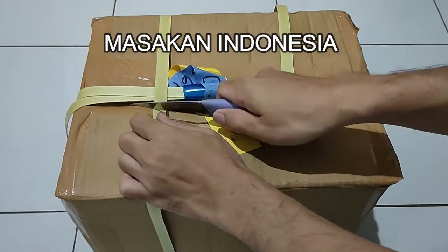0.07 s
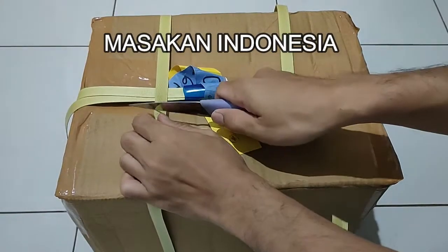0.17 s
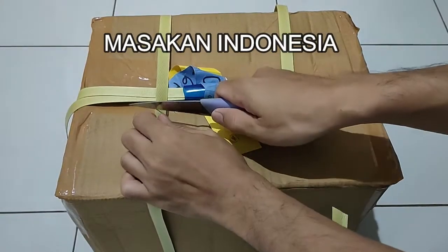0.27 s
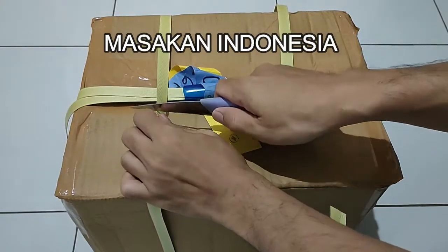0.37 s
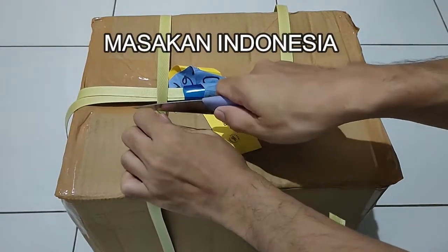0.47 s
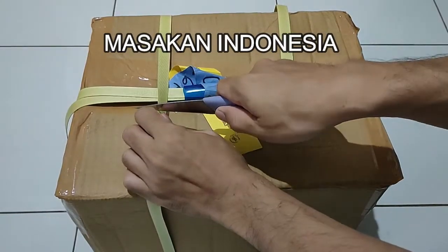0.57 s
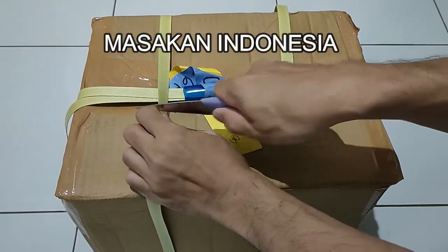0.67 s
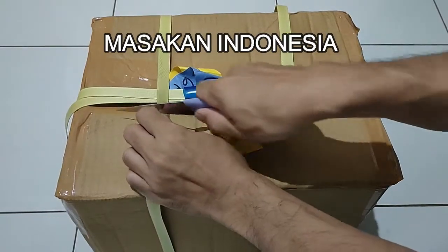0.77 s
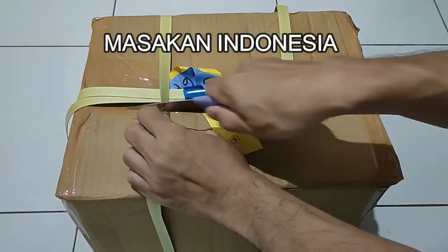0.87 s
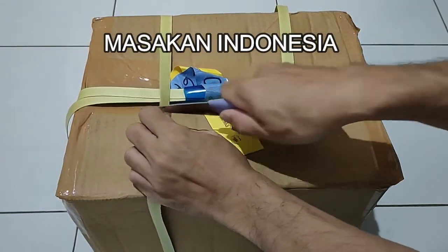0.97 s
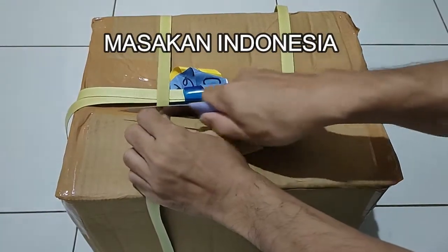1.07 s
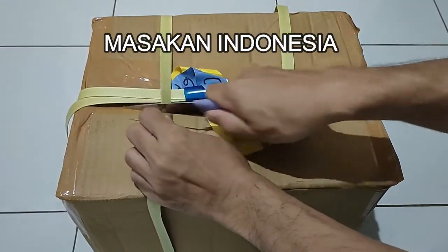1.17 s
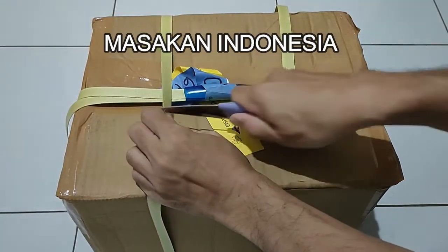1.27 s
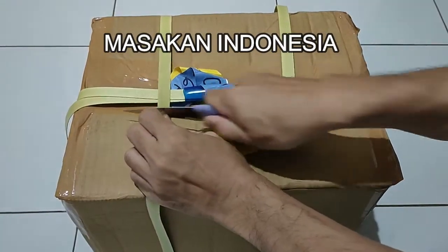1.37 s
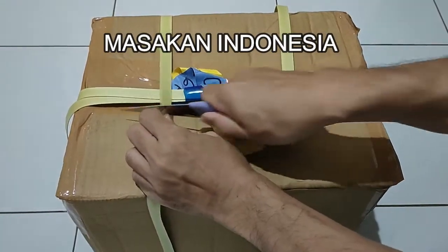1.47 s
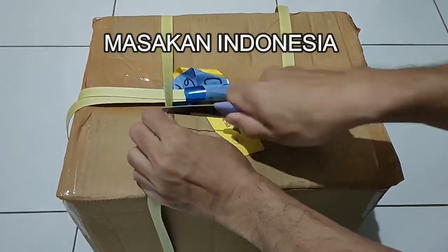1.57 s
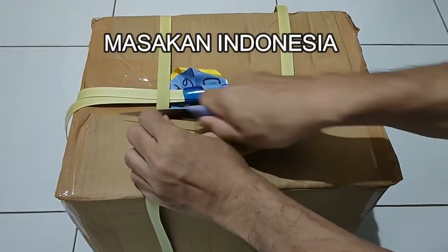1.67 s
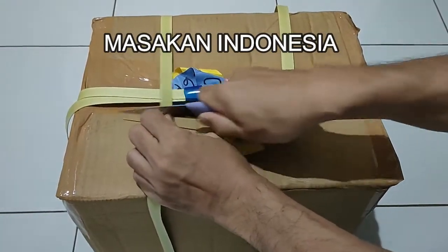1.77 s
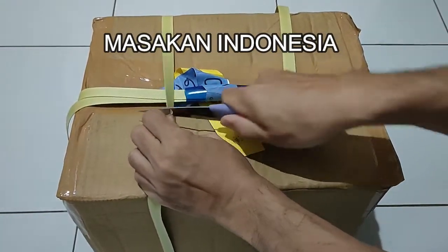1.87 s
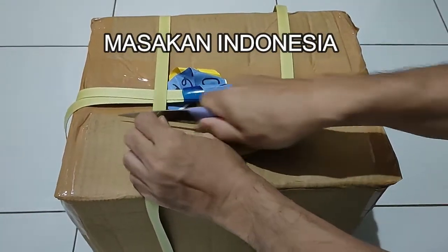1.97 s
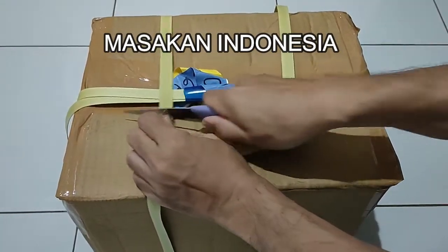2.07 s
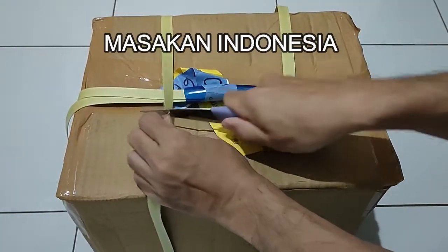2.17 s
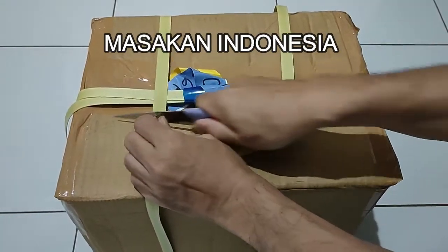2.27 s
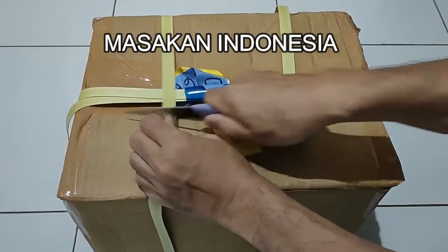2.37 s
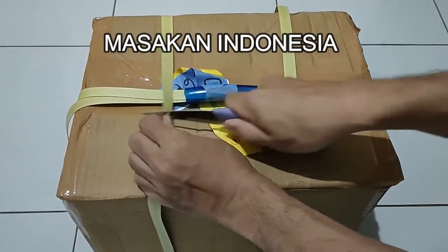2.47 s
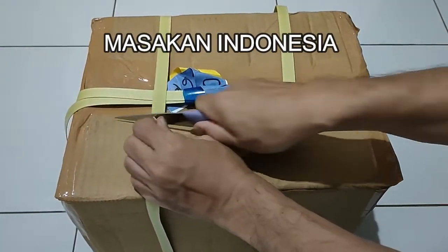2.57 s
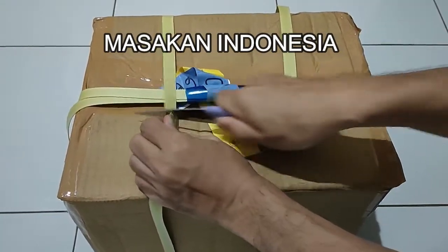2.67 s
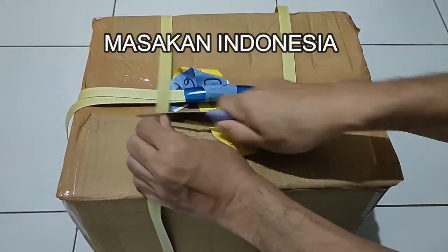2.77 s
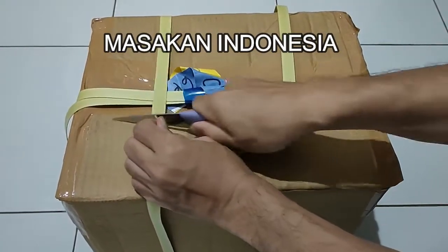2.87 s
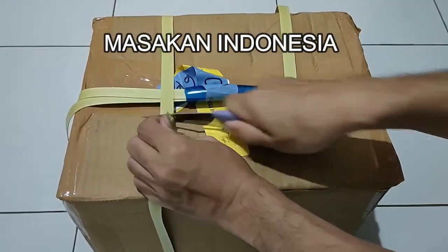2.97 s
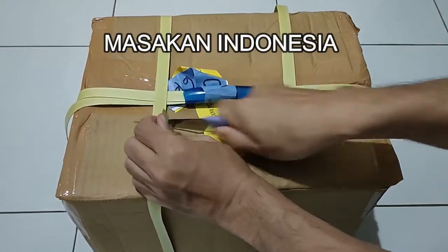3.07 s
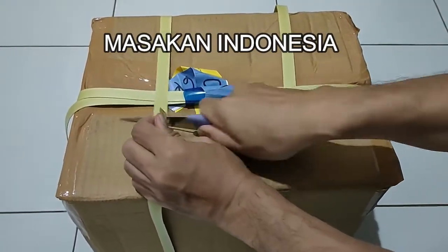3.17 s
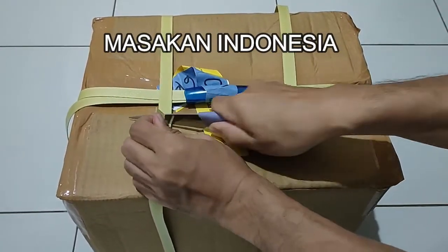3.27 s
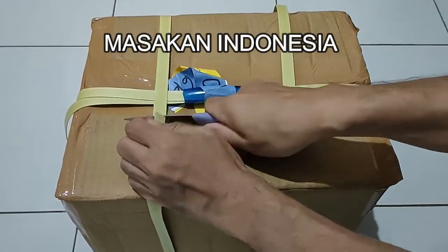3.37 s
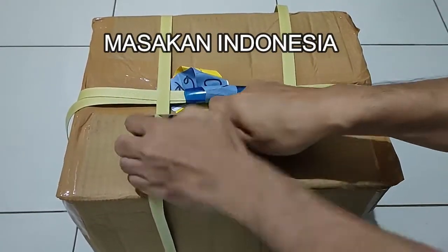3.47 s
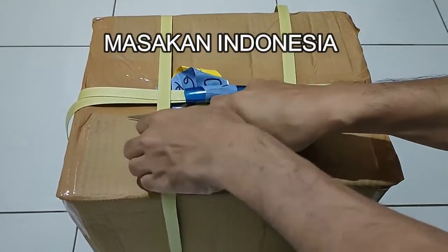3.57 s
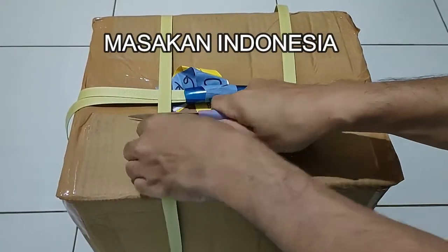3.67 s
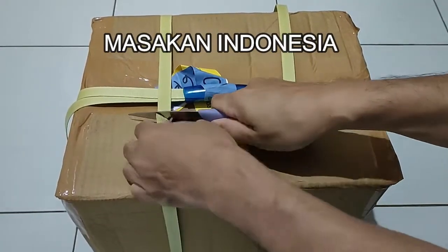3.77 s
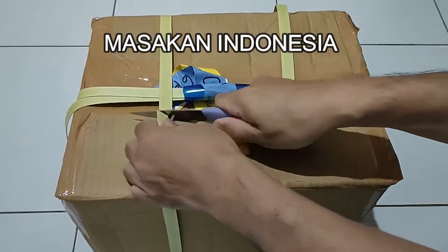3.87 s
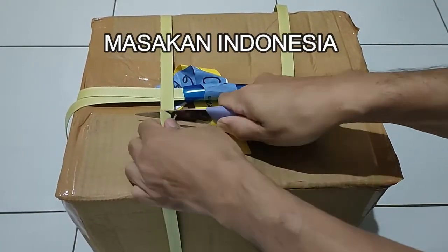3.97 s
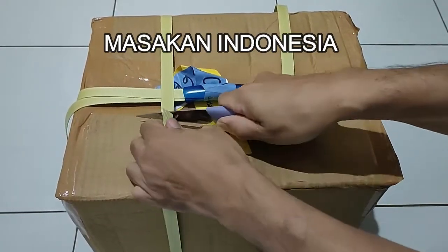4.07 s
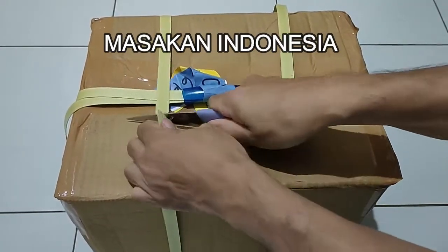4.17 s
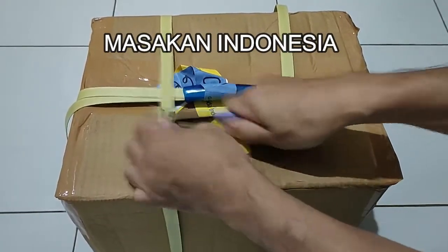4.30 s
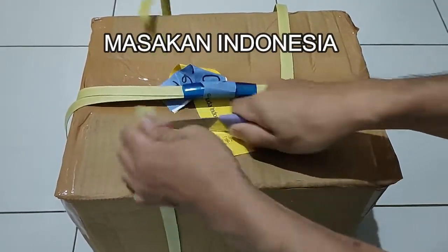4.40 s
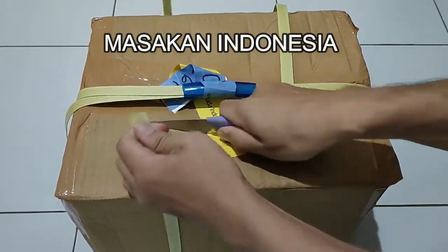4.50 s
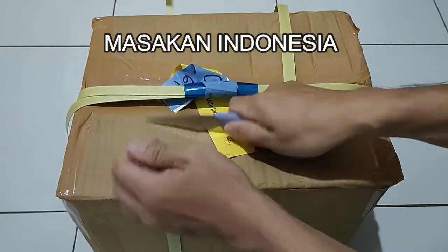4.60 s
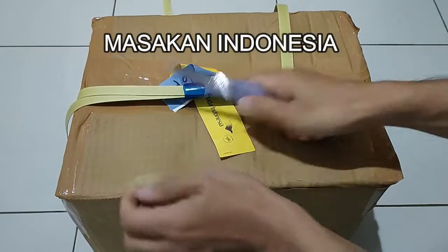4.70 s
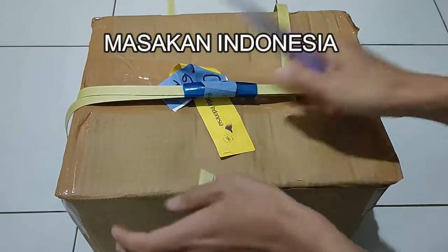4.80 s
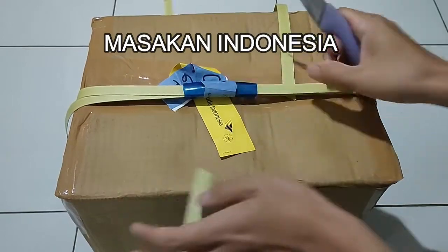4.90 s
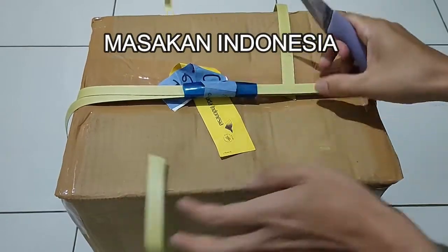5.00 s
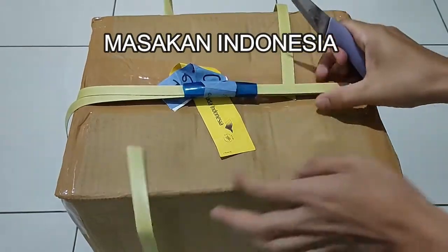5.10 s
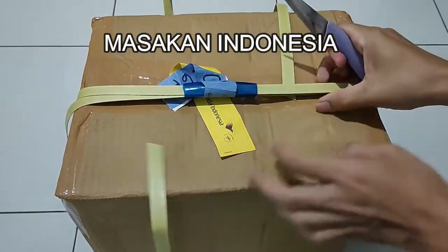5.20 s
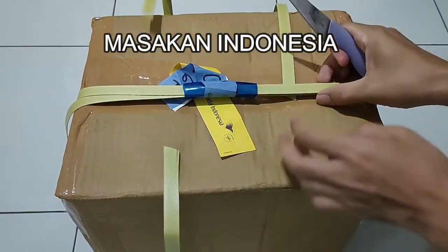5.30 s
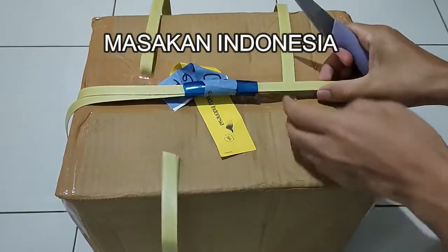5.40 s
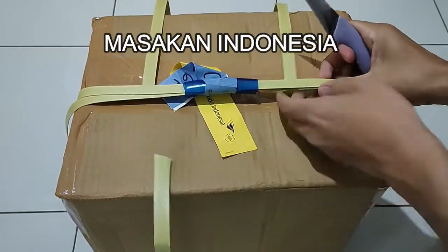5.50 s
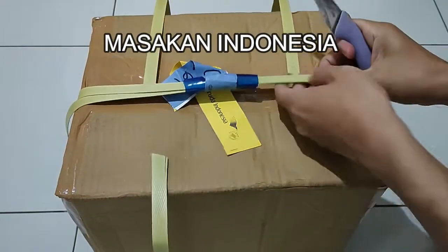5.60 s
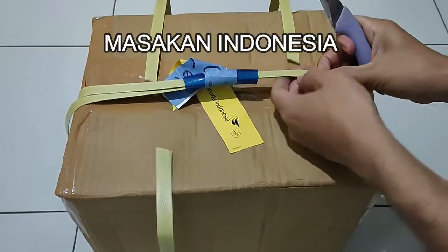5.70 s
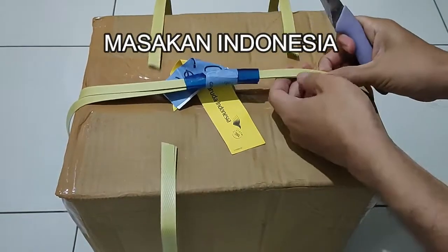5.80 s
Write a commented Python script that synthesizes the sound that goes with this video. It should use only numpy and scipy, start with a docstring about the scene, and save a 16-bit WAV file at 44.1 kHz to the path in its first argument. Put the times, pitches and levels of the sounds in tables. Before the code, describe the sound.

A knife saws at a plastic strap around a cardboard box, starting with soft scrapes, short rasps and thin squeaks. The fraying strap ticks and crackles more loudly while the hollow box knocks beneath it. After a brief lull the strap breaks with one sharp snap, followed by a few light ticks and rubs. It is heard close up in a tiled room with a faint motor hum.

```python
"""Cutting the strap on a cardboard box

A knife saws at a plastic strap round a cardboard box in a tiled room until the strap snaps.
Blade and hands scrape, with short rasps and thin squeaks. The strap ticks as it slips and frays,
and the hollow box booms under it. A motor hums and whines faintly in the background."""
import sys
import numpy as np
from scipy import signal
from scipy.fft import rfft, irfft, next_fast_len
from scipy.io import wavfile
from scipy.ndimage import uniform_filter1d

SR = 44100
rng = np.random.default_rng(int(sys.argv[2]) if len(sys.argv) > 2 else 0)


def write(x):
    x = np.atleast_2d(x).T
    wavfile.write(sys.argv[1], SR, np.round(np.clip(x, -1, 1) * 32767).astype(np.int16))


N = 257794

# The tone of each of the four rubbing sounds: (frequency [Hz], level [dB per Hz])
SCRAPE_TONE = [(410, -14), (700, -1.5), (757, 1.5), (1070, -10.5), (1260, 1.5), (1360, -4.5), (1690, -1.5),
               (2720, -3.5), (5800, -0.5), (10000, -8), (13000, -22), (22000, -120)]
HISS_TONE = [(6500, -6.5), (8000, 0.5), (10000, -5), (12000, -9.5), (13500, -39)]
SIZZLE_TONE = [(10500, -19), (12000, -6), (14000, -2.5), (16000, -3)]
RUMBLE_TONE = [(24, -25), (40, -36), (65, -19), (107, -5.5), (150, 2.5), (300, 2.5), (511, 5), (661, -5),
               (724, -5.5), (1210, -11.5), (1500, -9.5), (1950, -41), (3300, -120)]
# How hard blade and hands press, as the level of the steady scrape: (time [s], level [dB])
PRESSING = [(0, -65.5), (.75, -79), (1.1, -68), (1.4, -57.5), (1.5, -51), (1.8, -56), (1.88, -55),
            (2.3, -59), (2.5, -54.5), (2.68, -52.5), (3.05, -52.5), (3.4, -58.5), (3.47, -53.5),
            (3.75, -59.5), (4.15, -57.5), (4.27, -54.5), (4.6, -51.5), (5.2, -56), (5.36, -52.5),
            (5.85, -56)]
# Single slides of the blade:
# (start [s], length [s], hiss level [dB], sizzle above hiss [dB], scrape above hiss [dB])
BLADE_SLIDES = [(.09, 0.046, -78, -9, -2), (.61, 0.086, -74, -7, 0), (0.807, 0.072, -71, -7, 9.5),
                (.98, 0.048, -70.5, 0, 14), (1.161, .08, -61.5, -9, 0.5), (1.298, 0.043, -64.5, -7, 6),
                (1.432, .1, -54.5, -2, -10), (1.61, .21, -54.5, -3, -4), (1.93, 0.04, -64, -5, -12),
                (2.074, 0.027, -52.5, -5, -5), (2.235, 0.024, -59.5, -5, 1), (2.353, 0.034, -49.5, -8, -11),
                (2.503, 0.068, -53, -5, -6), (2.613, 0.068, -49, -5, -4.5), (2.773, 0.025, -54, -8, 1),
                (2.915, 0.039, -45, -11, -6), (3.124, 0.091, -47.5, -3, -0.5), (3.315, .04, -56.5, -2, -2),
                (3.546, 0.17, -58.5, -5, -15), (3.826, 0.046, -63, -3, 1), (3.965, .05, -60, -5, -13),
                (4.235, 0.068, -54.5, -6, -1.5), (4.418, 0.024, -48, -7, -8), (4.512, 0.044, -55, -10, 2.5),
                (4.857, 0.13, -56.5, -9, -11), (5.12, 0.056, -68.5, -7, 12), (5.3, 0.14, -64, -4, 6),
                (5.574, .04, -61, -1, -16), (5.69, 0.068, -61, -4, -4)]
# Shoves that make the box walls rumble: (start [s], length [s], level [dB])
WALL_SHOVES = [(0.354, .09, -61), (.81, 0.032, -56), (.98, 0.061, -50.5), (1.18, 0.026, -57),
               (1.33, 0.027, -49), (1.616, 0.03, -54), (2.225, 0.17, -55), (2.474, 0.063, -51.5),
               (2.758, 0.028, -50), (2.93, 0.061, -47.5), (3.125, 0.016, -47), (3.192, 0.065, -50.5),
               (3.457, 0.097, -52.5), (3.63, 0.035, -51.5), (4.258, 0.027, -56), (4.447, 0.047, -36),
               (4.76, 0.029, -57)]

def rubbing():
    """Blade and hands catch on tiny bumps: they scrape, hiss and sizzle, and the box walls rumble."""
    press = amp(np.interp(np.arange(N) / SR, *np.transpose(PRESSING)))
    start, length, db, sizzle_db, scrape_db = np.transpose(BLADE_SLIDES)
    slides = lambda above_db: swells(start, length, db + above_db, rise_db_per_s=800, fall_db_per_s=220)
    shoves = swells(*np.transpose(WALL_SHOVES), rise_db_per_s=500, fall_db_per_s=170)
    shake = drift(30)   # uneven pressure moves scrape, hiss and sizzle together
    scrape = np.hypot(press, slides(scrape_db)) * amp(1.35 * shake)
    out = scrape * stereo_noise(SCRAPE_TONE, grains(9000, spread_db=1.5))
    hiss = np.hypot(amp(-28) * press, slides(0)) * amp(.9 * shake + 1.8 * drift(20))
    out += hiss * stereo_noise(HISS_TONE, grains(9000, spread_db=3))
    sizzle = np.hypot(amp(-10) * press, slides(sizzle_db)) * amp(1.3 * shake)
    out += sizzle * stereo_noise(SIZZLE_TONE, grains(7300, spread_db=-6))
    rumble = np.hypot(amp(-4) * press, shoves) * amp(0.82 * drift(25))
    return out + rumble * stereo_noise(RUMBLE_TONE, grains(900, spread_db=2))


# The strap slips and its fibres part. The last three levels count from the high part's peak:
# (time [s], high part's peak [dB], high pitch [Hz], low pitch [Hz], low part [dB], top [dB], crack [dB])
STRAP_SLIPS = [(0.6435, -41, 4520, 1390, -20, -17, -12), (1.1573, -41.5, 6250, 2230, -11, -10, -10),
               (1.7777, -35, 4790, 1570, -13, 1, -10), (1.8194, -41, 8500, 3000, -15, 2, -10),
               (1.8356, -39, 7490, 1650, -17, -8, -12), (1.9155, -38, 6200, 1250, -11, -4, -10),
               (2.0853, -29, 7040, 1320, -13, 4, -3), (2.1065, -33, 4600, 2150, -9, -8, -16),
               (2.1986, -36.5, 4810, 1440, -6, -10, -10), (2.354, -36, 7560, 1300, -9, 9, -12),
               (2.3684, -37, 4700, 1550, -17, 2, -6), (2.376, -29.5, 4530, 1610, -13, 3, -4),
               (2.383, -35, 7190, 1390, -4, -6, -4), (2.3968, -33, 7270, 1500, -19, 4, -10),
               (2.4872, -30, 8300, 2800, 1, -8, -4), (2.5039, -33, 8740, 2800, -3, -6, -1),
               (2.6723, -18, 6050, 1440, -20, -3.5, -12), (2.6807, -30, 5100, 2360, -28, -6, -16),
               (2.777, -20.5, 4300, 2180, -6.5, -15, -3.5), (2.9207, -21.5, 4840, 1360, -25, -8, -12),
               (2.9366, -17.5, 5700, 1470, -21, -5.5, -19), (2.9496, -21.5, 5700, 3240, -3, -14, -7),
               (2.9603, -23, 5500, 1540, -25, -21, -13), (2.9764, -23.5, 5550, 1520, -8, -16, -14),
               (3.083, -37, 6100, 2380, -2, -7, 5), (3.1194, -12.5, 4400, 1560, -12.5, -7, 2),
               (3.134, -26, 6200, 1230, -11, -14, -12), (3.1797, -18, 6350, 2780, -1.5, -8, 0),
               (3.193, -29, 6590, 2100, -15, -12, -8), (4.2126, -37, 7220, 1410, -19, -13, -12),
               (4.4204, -25, 7850, 2070, 7.5, -5, 0.5), (4.4222, -22, 4580, 2270, 2, -10, -4),
               (4.4254, -21.5, 5370, 1260, 0, -10, 8), (4.8538, -28.5, 8100, 1780, -12.5, -15, -10),
               (4.872, -24.5, 9000, 1650, -8, -20, -5.5), (4.9401, -27.5, 7500, 1750, -9, -1, -5),
               (5.6361, -38, 3770, 1170, -16, -10, 4), (5.716, -30, 5770, 1140, -15, -18, -7)]

def strap_ticks():
    """Each slip is a dying burst of noise: a high part, a low part, a bright top and a broad crack."""
    out, t = np.zeros(N), np.arange(2000) / SR
    rise_s, fade_s = .0006, .01
    envelope = np.minimum(t / rise_s, 1) * amp(-60 * t / fade_s)
    for time, db, high_hz, low_hz, *parts_db in STRAP_SLIPS:
        bands_hz = (high_hz / 1.47, high_hz * 1.12), (low_hz / 1.21, low_hz * 1.22)
        bands_hz += (9000, 15900), (780, 9000)   # top and crack
        i = round(time * SR)
        for band_hz, part_db in zip(bands_hz, (0, *parts_db)):
            part = filtered(rng.standard_normal(len(t)) * envelope, band_hz, "band")
            out[i:i + len(t)] += amp(db + part_db) * part / abs(part).max()
    return out


# Knocks on the box; the loudest is the snap: (time [s], level [dB], contact time [s], left boost [dB])
BOX_KNOCKS = [(0.999, -44, 0.0017, -2), (1.029, -44, 0.001, -2), (1.323, -43, 0.0011, -2),
              (1.36, -50, 0.0022, -4), (1.514, -45.5, 0.0029, 0), (1.65, -41, 0.00086, 0),
              (2.088, -36.5, 0.0013, -2), (2.19, -39, 0.00095, 1), (2.313, -35.5, 0.0035, -1),
              (2.323, -36, 0.0027, -5), (2.46, -45, 0.0018, -1), (2.604, -37.5, 0.0023, 1),
              (2.855, -27, 0.0017, -0.5), (2.977, -23.5, 0.001, 2.5), (3.121, -21, 0.0013, -1),
              (3.133, -28.5, 0.0016, 1), (3.18, -20.5, 0.00077, -0.5), (3.195, -31, 0.0018, 2),
              (3.429, -35.5, 0.0021, 1), (3.456, -34, 0.0015, -2), (3.463, -35, 0.0026, -10),
              (3.495, -31, 0.0016, -11), (3.525, -49, 0.0012, -6), (3.647, -30, 0.0028, 1.5),
              (3.65, -26, 0.0014, -1), (4.421, -18, 0.001, 9.5), (4.425, -5, 0.0012, 3),
              (4.431, -19, 0.0011, -5), (4.439, -24, 0.0018, 4), (4.444, -16.5, 0.0015, 5),
              (4.855, -38, 0.0011, -1), (5.548, -42, 0.0011, -1), (5.596, -41, 0.0021, 1)]
# The notes the hollow box rings at: (pitch [Hz], level [dB], time to fade by 60 dB [s])
BOX_NOTES = [(184.3, -1, 0.48), (194, -23, 0.069), (288.7, -3, 0.25), (353, 0.5, 0.058), (418, 5.5, 0.065),
             (443, 0, 0.065), (512, 4.5, 0.075), (584, -3, 0.17), (683, -12, 0.22), (800, -1, 0.076),
             (1020, 5, 0.058), (1150, 6, 0.076), (1650, -27, .05), (2051, -11, .05)]

def box_knocks():
    """A knock drags the lid in, then it springs back; this push is heard and sets the box ringing."""
    out, t = np.zeros((2, N)), np.arange(16000) / SR
    for time, db, contact_s, left_db in BOX_KNOCKS:
        u = t / contact_s - 1   # below zero while the lid is dragged in
        spring_back = -np.cos(np.pi * u / (0.5 + 0.29 * u)) * np.exp(-.6 * u)
        push = np.where(u < 0, -(1 + u) ** 2, spring_back) * (u < 6)
        notes = sum(amp(note_db + rng.normal(0, 0.74) - 60 * t / fade_s) * np.sin(2 * np.pi * hz * t)
                    for hz, note_db, fade_s in BOX_NOTES)
        ring = signal.fftconvolve(notes, push[:900])[:len(t)]
        knock = amp(db) * (0.91 * push + amp(-9) * ring / abs(ring).max())
        i = round(time * SR)
        out[:, i:i + len(t)] += (amp([[left_db], [0]]) * knock)[:, :N - i]
    return filtered(out, 150, "high", order=3)   # the lid gives off little deep bass


# Thuds of the rocking box: (time [s], pitch [Hz], level [dB], time to fade by 60 dB [s])
BOX_THUDS = [(2.603, 85.4, -43, 0.21), (2.857, 70, -42, 0.15), (3.119, 61, -39, 0.13),
             (3.488, 65.5, -40, 0.23), (4.43, 59.6, -44, 0.23)]

def box_thuds():
    """The whole box rocks on the floor, each time with one deep, dying note."""
    out, t = np.zeros(N), np.arange(16000) / SR
    rise = np.minimum(t / 0.0061, 1)
    for time, hz, db, fade_s in BOX_THUDS:
        i = round(time * SR)
        out[i:i + len(t)] += rise * amp(db - 60 * t / fade_s) * np.sin(2 * np.pi * hz * t)
    return out


# Short blade strokes, and at 3.455 s a short pitched tick of the strap: (start [s], end [s], first pitch [Hz],
# last pitch [Hz], width [Hz], level [dB])
BLADE_STROKES = [(.8, .89, 8800, 10300, 900, -63.5), (0.974, 1.056, 9500, 8240, 1200, -66),
                 (1.119, 1.198, 9250, 10000, 700, -61), (1.2, 1.258, 11000, 11500, 900, -57),
                 (1.292, 1.378, 9100, 9360, 500, -56), (1.4, 1.467, 7500, 7300, 800, -56),
                 (1.45, 1.55, 5500, 5770, 700, -50), (1.6, 1.738, 5740, 6500, 900, -51),
                 (1.904, 1.978, 7300, 7500, 350, -58), (2.166, 2.218, 5000, 5360, 900, -59),
                 (2.223, 2.268, 6500, 6900, 1500, -53), (2.324, 2.35, 6960, 8300, 1500, -48),
                 (3.455, 3.46, 2930, 2880, 300, -41), (3.47, 3.562, 2690, 2370, 352, -52.5)]

def blade_rasps():
    """Each stroke rasps: a band of noise round a gliding pitch, with its own noise left and right."""
    out = np.zeros((2, N))
    for start, end, from_hz, to_hz, width_hz, db in BLADE_STROKES:
        i, size = round(start * SR), round((end - start) * SR)
        rough = rms_one(filtered(rng.standard_normal((2, SR // 5)), width_hz, "low"))[:, :size]
        phase = 2 * np.pi * np.cumsum(np.linspace(from_hz, to_hz, size)) / SR
        out[:, i:i + size] += amp(db) * signal.windows.tukey(size, .5) * rough * np.sin(phase)
    return out


# Thin squeaks: (start [s], end [s], time of the arch's top [s], top pitch [Hz], level [dB])
THIN_SQUEAKS = [(1.712, 1.785, 1.746, 11300, -58), (1.985, 2.065, 2.032, 11300, -57),
                (2.275, 2.32, 2.325, 10000, -61)]

def squeaks():
    """A fluttering tone arches in pitch, with a softer one just above it."""
    out, flutter_db = np.zeros(N), 4 * drift(150)
    arch_hz_per_s2 = 8e5
    for start, end, top_s, top_hz, db in THIN_SQUEAKS:
        i = np.arange(round(start * SR), round(end * SR))
        hz = top_hz - arch_hz_per_s2 * (i / SR - top_s) ** 2
        phase = 2 * np.pi * np.cumsum(hz) / SR
        tones = np.sin(phase) + amp(-4) * np.sin(1.055 * phase)
        out[i] += amp(db + flutter_db[i]) * signal.windows.tukey(len(i), .5) * tones
    return out


def tiled_room(sound):
    """Echoes off the tiles blur into a dying tail, dull on top and the same on both sides in the bass."""
    t = np.arange(SR // 2) / SR
    fade_s, echo_db, bass_hz, dull_hz = 0.42, -13, 700, 5570
    noise = rng.standard_normal((3, len(t))) * amp(-60 * t / fade_s) * np.minimum(t / 0.0011, 1)
    tail = filtered(noise[2], bass_hz, "low") + filtered(noise[:2], bass_hz, "high")
    tail = filtered(tail, dull_hz, "low", order=1)
    tail /= np.sqrt((tail ** 2).sum(1).mean())
    return amp(echo_db) * signal.fftconvolve(sound[None], tail)[:, :N]


# The motor's low hum: (pitch [Hz], width [Hz], level [dB])
MOTOR_HUM = [(81, 1.6, -68.5), (97.6, 13, -68.5), (192, 49, -67.5), (300, 18, -64), (500.2, 21, -71)]
# The motor's high whine: (multiple of the turning rate [times], level [dB])
MOTOR_WHINE = [(51, -74), (52, -79), (53, -73), (54, -73), (55, -64), (56, -70), (57, -75), (58, -73),
               (59, -74)]

def motor():
    """Narrow bands of noise and a wavering drone hum; high multiples of the turning rate whine."""
    turning_hz, drone_hz, drone_db = 77.77, 288.3, -58
    hum, t = np.zeros(N), np.arange(N) / SR
    for hz, width_hz, db in MOTOR_HUM:
        band = shaped(rng.standard_normal(N), lambda f: 1 / (1 + (2 * (f - hz) / width_hz) ** 2))
        hum += amp(db) * rms_one(band)
    whine = sum(amp(db + 0.5 * drift(3.3)) * np.sin(2 * np.pi * (k * turning_hz * t + rng.random((2, 1))))
                for k, db in MOTOR_WHINE)
    drone_phase = 2 * np.pi * np.cumsum(drone_hz + 3.64 * drift(13)) / SR
    return hum + whine + amp(drone_db + 1.3 * drift(14)) * np.sin(drone_phase)


# The tone of the background noise: (frequency [Hz], level [dB per Hz])
AIR_TONE = [(25, -40), (60, -6.5), (90, -9.5), (260, -5), (500, -8.5), (900, -10), (2000, -17.5),
            (3500, -23), (4350, -18), (5200, -24.5), (6600, -16.5), (8500, -31), (11000, -37), (16000, -38)]

def air():
    """The faint, steady noise of the room and the microphone."""
    return amp(-56.5) * stereo_noise(AIR_TONE, rng.standard_normal(N))


# How alike left and right are in spread-out noise: (frequency [Hz], likeness [-1 to 1])
SIDES_ALIKE = [(60, 0.91), (180, 1), (550, 0.29), (1650, -0.17), (4970, 0.025), (15000, 0.057)]

def stereo_noise(tone, source):
    """Give noise a tone and spread it out: left and right are alike in the bass, unlike higher up."""
    alike = lambda hz: np.clip(at_hz(SIDES_ALIKE, hz), -.9, .99)
    middle = shaped(source, lambda hz: amp(at_hz(tone, hz)) * np.sqrt(1 + alike(hz)))
    envelope = np.sqrt(abs(uniform_filter1d(source ** 2, size=20)))
    side_noise = rng.standard_normal(N) * envelope   # follows the same grains
    side = shaped(side_noise, lambda hz: amp(at_hz(tone, hz)) * np.sqrt(1 - alike(hz)))
    return np.array([middle + side, middle - side]) / np.sqrt(np.mean(middle ** 2))


def grains(per_s, spread_db):
    """Tiny catches of a rough surface: random clicks of uneven size."""
    sizes = amp(spread_db * np.minimum(rng.exponential(1, N), 5)) * rng.choice([-1, 1], N)
    return rms_one(sizes * (rng.random(N) < per_s / SR))


def swells(start, length, db, rise_db_per_s, fall_db_per_s):
    """One loudness curve for events that each rise, hold and fall."""
    t = np.arange(0, N + 64, 64)[:, None] / SR
    before_s, after_s = np.maximum(start - t, 0), np.maximum(t - start - length, 0)
    gains = amp(db - rise_db_per_s * before_s - fall_db_per_s * after_s)
    return np.interp(np.arange(N) / SR, t[:, 0], np.sqrt((gains ** 2).sum(1)))


def drift(rate_hz):
    """A random curve that wanders by about 1 either way."""
    count = int(N / SR * rate_hz * 2) + 2
    return np.interp(np.arange(N), np.linspace(0, N, count), rng.standard_normal(count))


def filtered(x, hz, kind, order=2):
    """Keep the lows, the highs or one band of a sound."""
    return signal.sosfilt(signal.butter(order, hz, kind, fs=SR, output="sos"), x)


def shaped(x, gain):
    """Turn each frequency up or down by gain(hz)."""
    size = next_fast_len(N)
    hz = np.maximum(np.arange(size // 2 + 1) * SR / size, 1)
    return irfft(rfft(x, size) * gain(hz), size)[..., :N]


def at_hz(table, hz):
    """Read between a table's rows, giving every octave equal room."""
    row_hz, values = np.transpose(table)
    return np.interp(np.log(hz), np.log(row_hz), values)


def amp(db):
    """Turn decibels into a gain."""
    return 10 ** (np.asarray(db) / 20)


def rms_one(x):
    """Scale a sound to an average strength (rms) of 1."""
    return x / np.sqrt(np.mean(x ** 2) + 1e-20)


def scene():
    """Add it all up; ticks, squeaks and the box reach the left side first and echo in the room."""
    near = strap_ticks() + squeaks() + box_knocks() + box_thuds()
    near[1] = np.roll(near[1], 6)   # the right side is 6 samples late
    return near + air() + tiled_room(near[1]) + rubbing() + blade_rasps() + motor()


# How much weaker the microphone's left side is: (frequency [Hz], left compared with right [dB])
LEFT_LEVEL = [(60, -7.5), (240, -8.5), (950, -8.0), (3770, -8.0), (15000, -13)]

def record(dry):
    """The microphone hears less on the left, and the highest treble is cut."""
    gain_db, cutoff_hz = 1.5, 15900
    left = shaped(dry[0], lambda hz: amp(at_hz(LEFT_LEVEL, hz)))
    treble_cut = signal.ellip(12, .5, 70, cutoff_hz, fs=SR, output="sos")
    return signal.sosfilt(treble_cut, amp(gain_db) * np.array([left, dry[1]]))


dry = scene()
out = record(dry)
write(out)
```